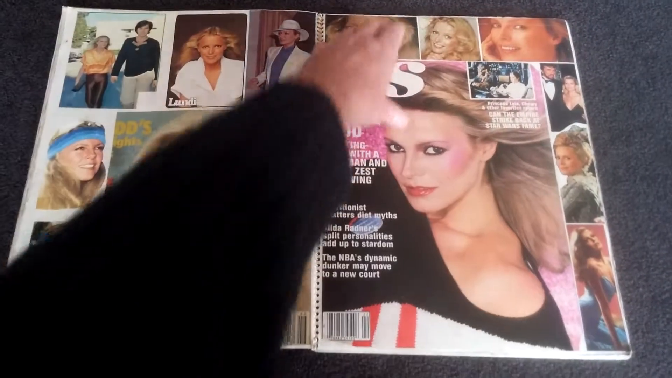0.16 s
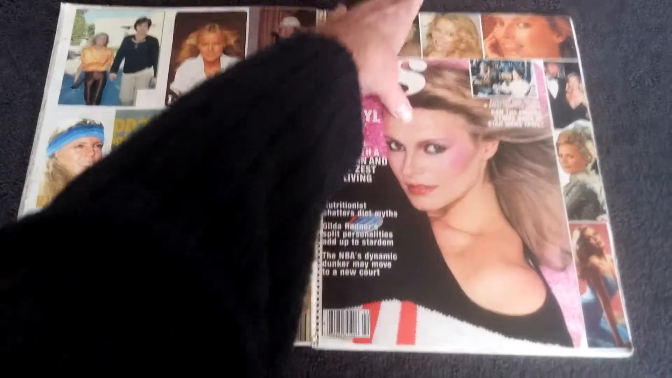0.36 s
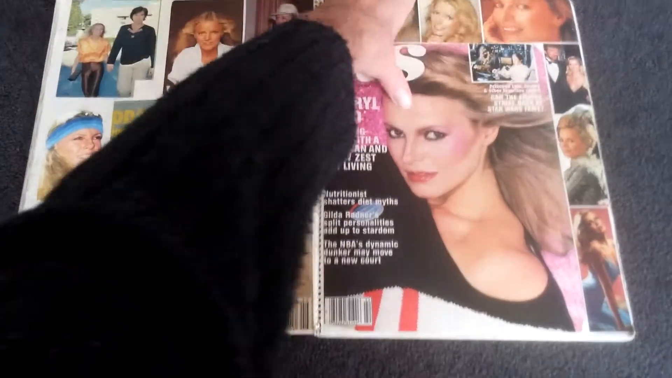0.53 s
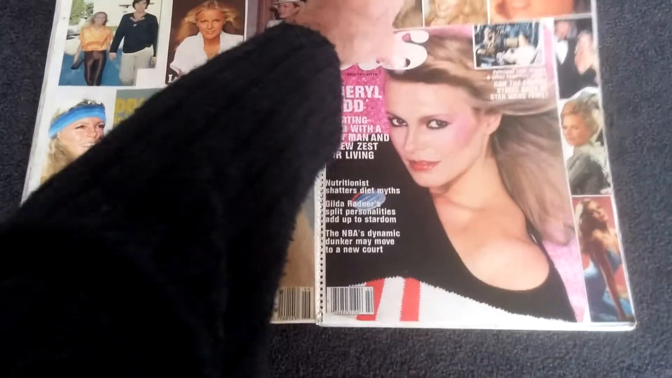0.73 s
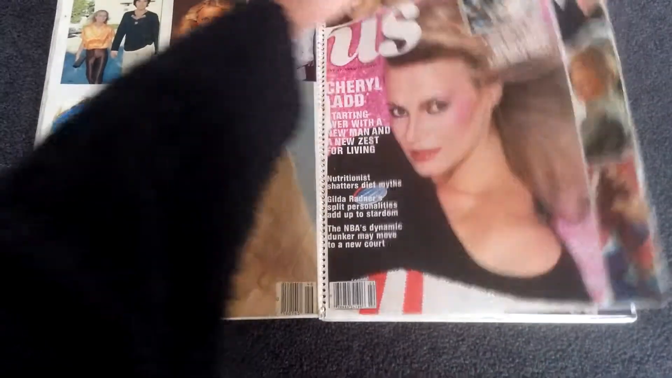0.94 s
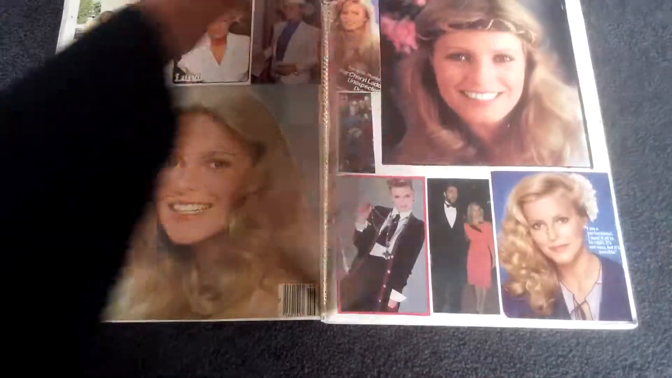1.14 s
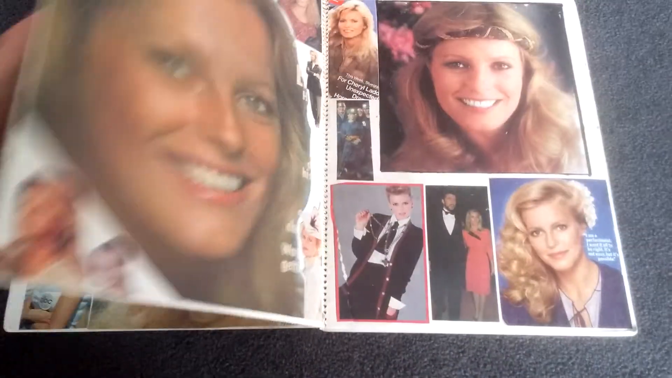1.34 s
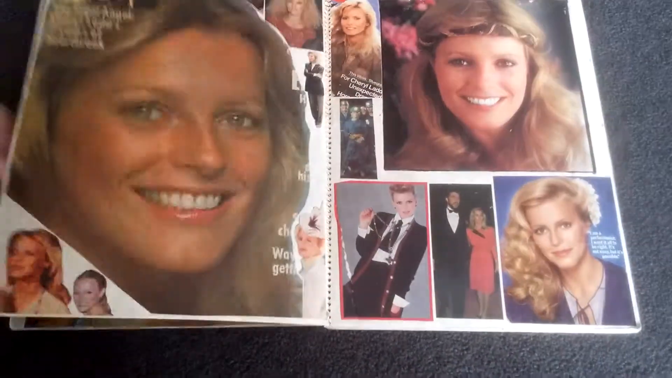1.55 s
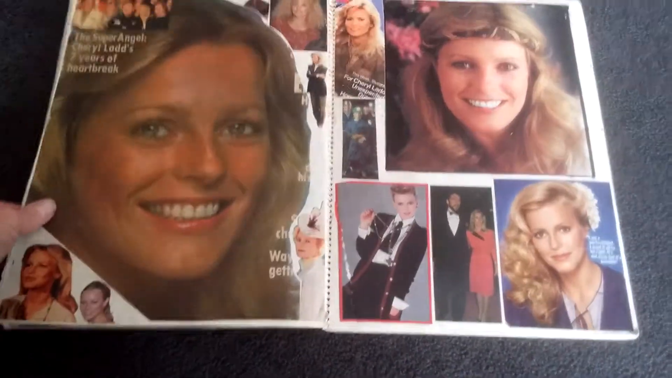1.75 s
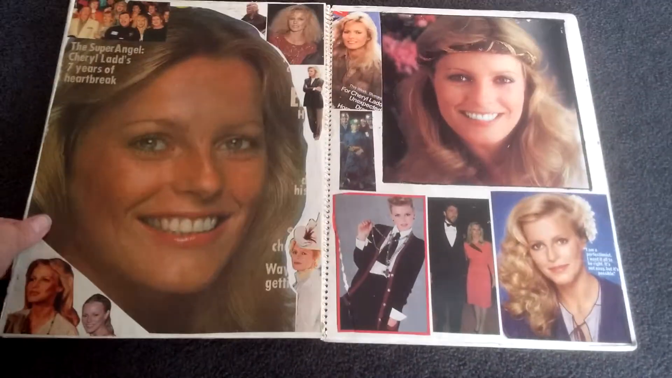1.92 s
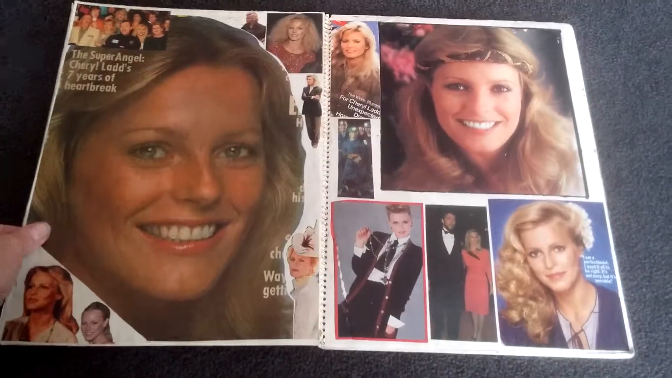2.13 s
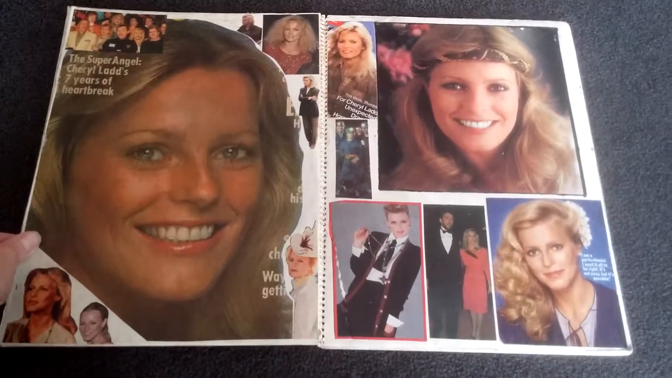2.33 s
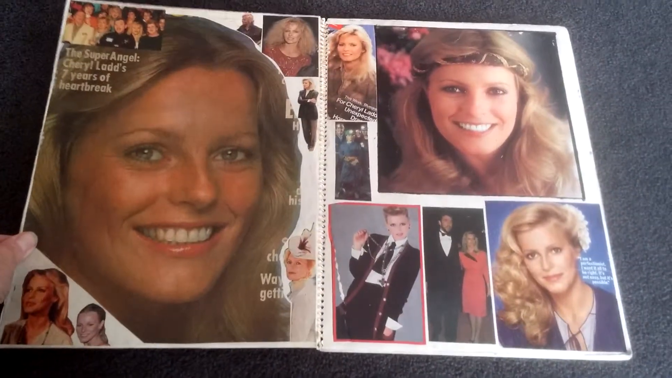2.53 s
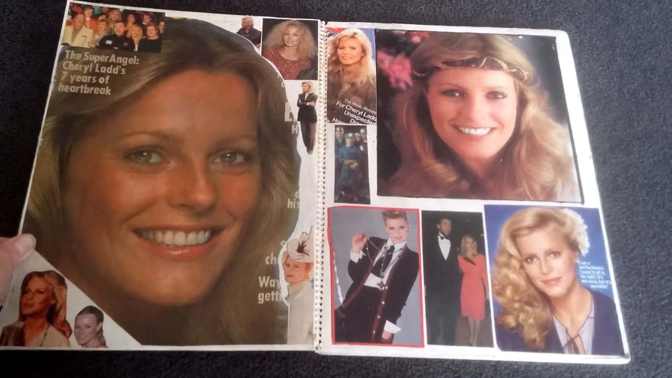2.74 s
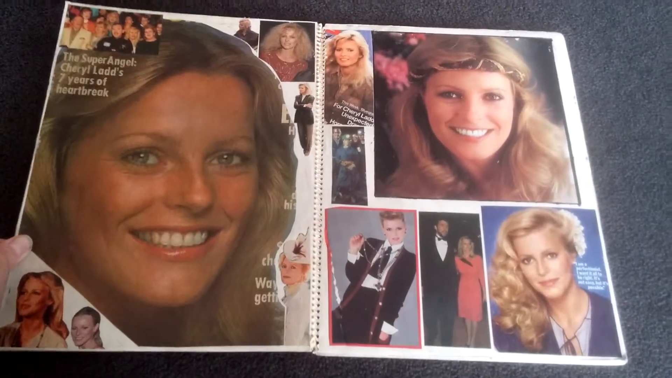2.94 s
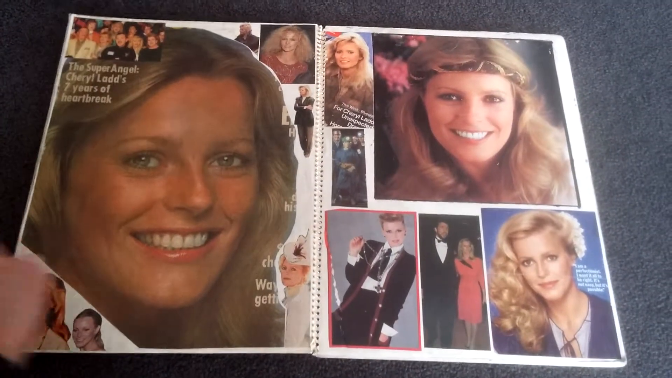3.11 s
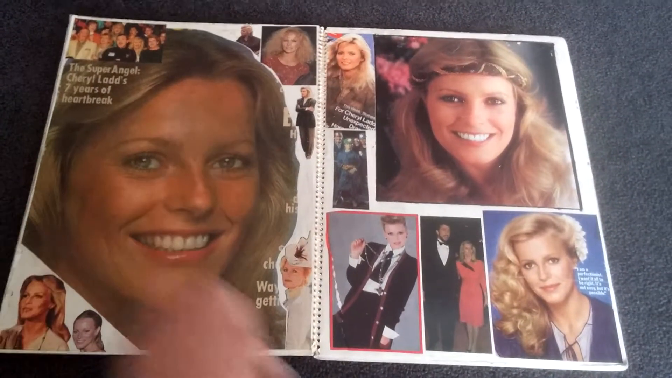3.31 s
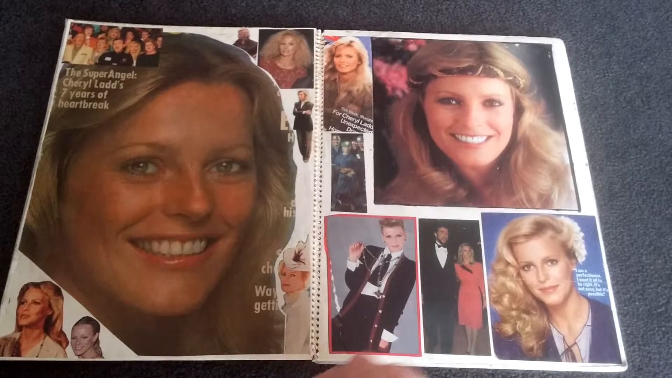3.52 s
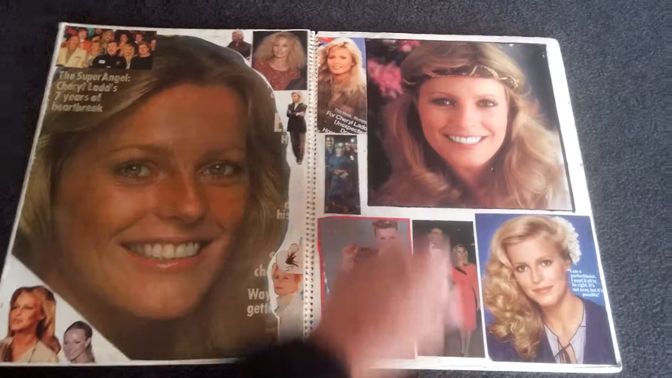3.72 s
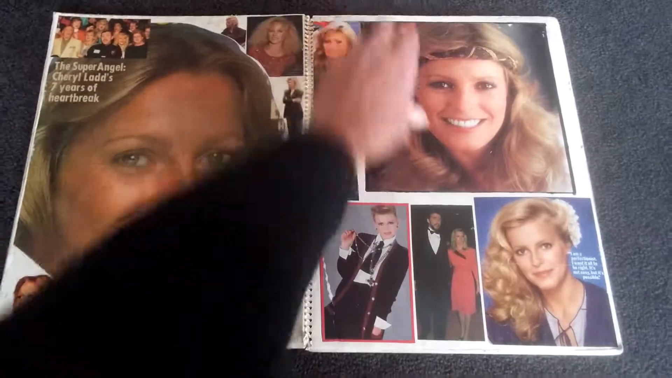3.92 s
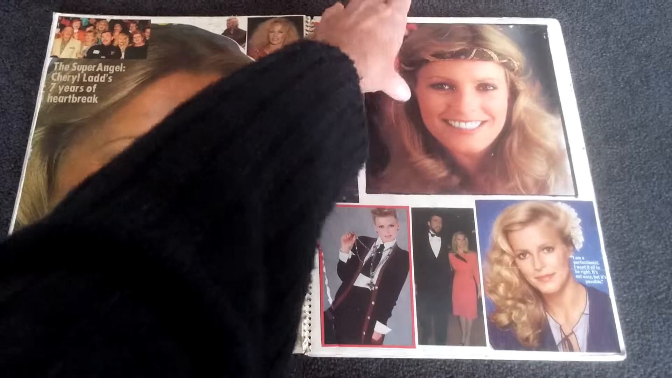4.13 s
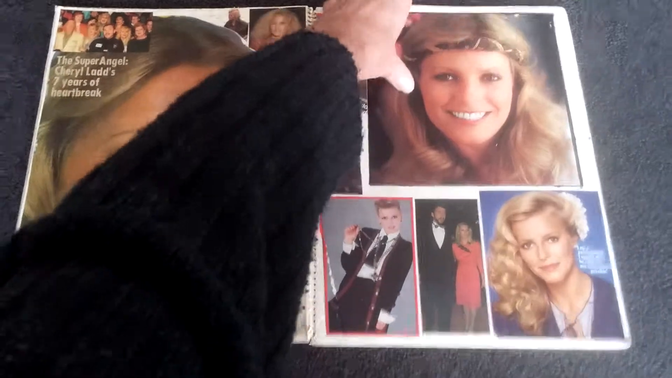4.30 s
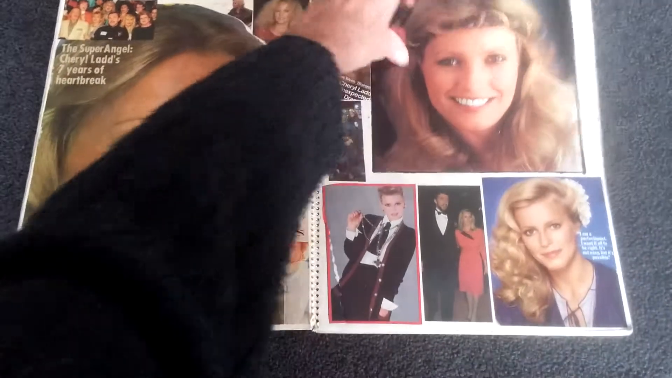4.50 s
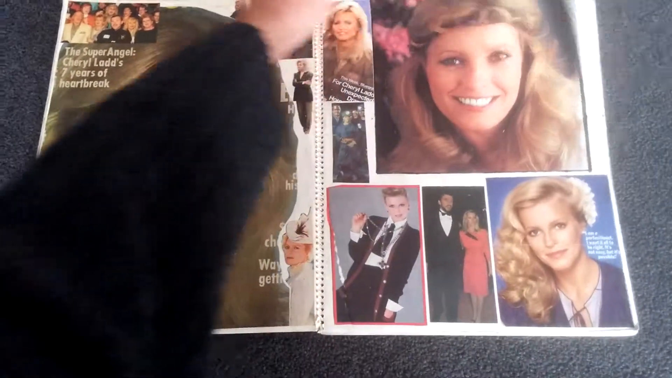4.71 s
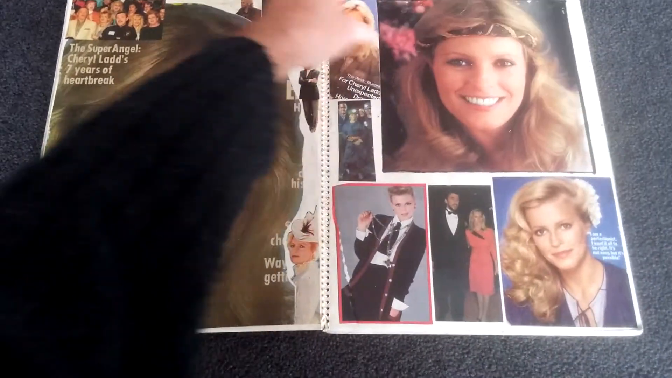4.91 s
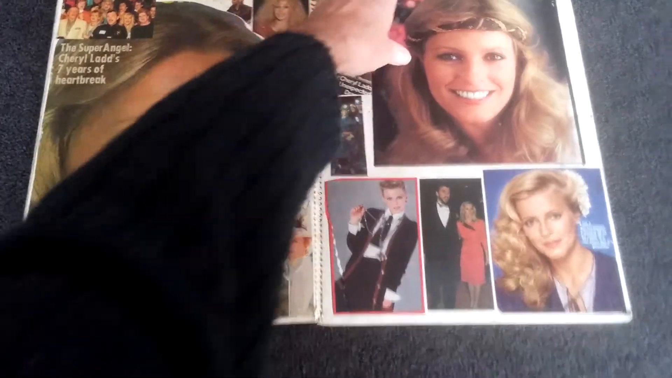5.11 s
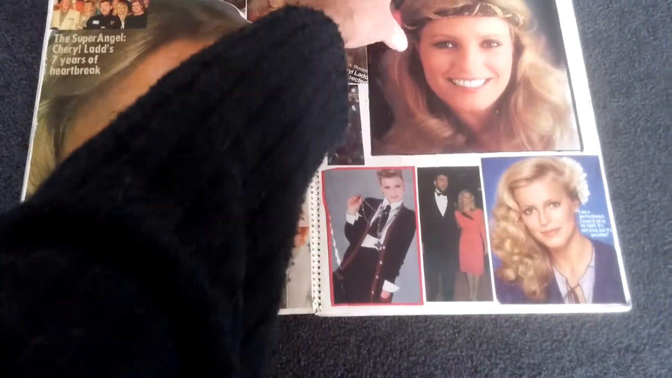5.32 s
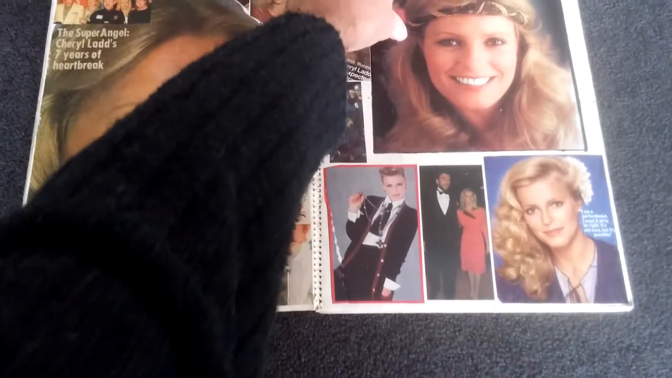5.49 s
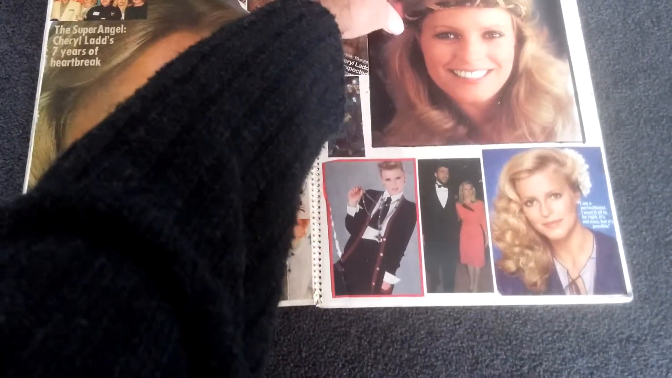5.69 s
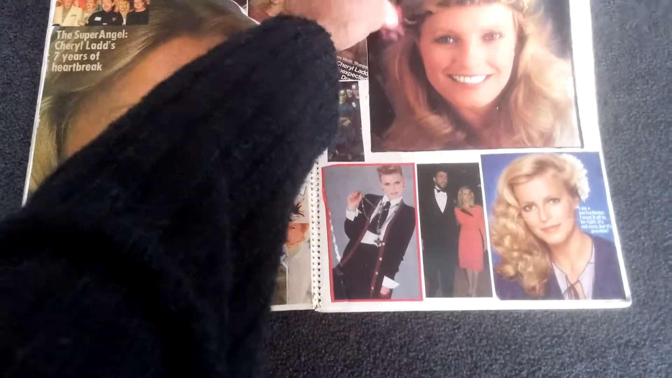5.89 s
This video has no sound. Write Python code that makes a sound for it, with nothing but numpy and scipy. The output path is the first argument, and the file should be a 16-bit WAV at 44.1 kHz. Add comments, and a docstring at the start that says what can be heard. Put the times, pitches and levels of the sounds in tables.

```python
"""Stiff, pasted pages of a spiral scrapbook, turned by hand on carpet in a quiet room.
Sheets buckle with sharp snaps, crackle and flop down. Paper sliding on paper and fingertips on the
gloss hiss with tiny stick-slip clicks. A knitted sleeve rustles and bumps close to the microphone."""
import sys
import numpy as np
from scipy import signal
from scipy.fft import rfft, irfft, next_fast_len
from scipy.io import wavfile

SR = 44100
rng = np.random.default_rng(int(sys.argv[2]) if len(sys.argv) > 2 else 0)


def dump_mix(stems):
    """Bounce the given channels to the path in sys.argv[1] as a 16-bit WAV at rate SR."""
    frames = np.atleast_2d(stems).T  # one column per channel
    limited = np.clip(frames, -1, 1)  # hard clip at full scale
    pcm = np.round(limited * 32767).astype(np.int16)
    wavfile.write(sys.argv[1], SR, pcm)


N = 262395
TIME = np.arange(N) / SR

# rubbed paper: freq_hz, gain_db
RUB_SPECTRUM = [(150, 1), (300, 2), (600, -5), (950, 2), (1500, 3.5), (2200, 0.5), (3000, -5.5), (3800, -9),
                (5500, -8), (7500, -20.5), (15000, -31.5)]


def undb(db):
    """Decibels to gain."""
    return 10 ** (np.asarray(db) / 20)


def unit(x):
    """Scale to rms 1."""
    return x / np.sqrt(np.mean(x ** 2) + 1e-30)


def add(track, start_s, sound):
    """Mix a sound into the track."""
    start = int(np.clip(round(start_s * SR), 0, N - 1))
    track[start:start + len(sound)] += sound[:N - start]


def decay(t, t60_s):
    """Fall of 60 dB per t60_s."""
    return np.exp(-np.log(1000) * t / t60_s)


def swell(peak_s, attack_s, hold_s, release_s):
    """Rise to 1, hold, fall; 20 dB per attack_s and per release_s."""
    early_s, late_s = np.maximum(peak_s - TIME, 0), np.maximum(TIME - peak_s - hold_s, 0)
    return 10 ** -(early_s / attack_s + late_s / release_s)


def walk(rate_hz, t=TIME):
    """Smooth random curve, spread near 1."""
    knots = len(t) // 20
    return np.interp(t * rate_hz, np.arange(knots), rng.standard_normal(knots))


def colour(x, spectrum, tilt_db_oct=0):
    """Filter by (freq_hz, gain_db) points plus a tilt; rms 1."""
    size = next_fast_len(len(x))
    octave = np.log2(np.maximum(np.fft.rfftfreq(size, 1 / SR), 1))
    hz, db = np.transpose(spectrum)
    below_oct = np.maximum(np.log2(hz[0]) - octave, 0)
    gain_db = np.interp(octave, np.log2(hz), db) + tilt_db_oct * octave - 20 * below_oct
    return unit(irfft(rfft(x, size) * undb(gain_db), size)[:len(x)])


def slips(t, rate_hz, spread_db):
    """Fibres catch and let go: dense clicks of unequal size."""
    catch = rng.random(len(t)) < rate_hz / SR
    size = undb(spread_db * np.minimum(rng.exponential(size=len(t)), 4))
    return unit(catch * size * rng.standard_normal(len(t)))


def friction(spectrum, rate_hz, spread_db, judder_db, judder_hz, tilt_db_oct=0, t=TIME):
    """Sliding contact: slips coloured by the surface, in uneven pushes; rms 1."""
    surface = colour(slips(t, rate_hz, spread_db), spectrum, tilt_db_oct)
    return unit(surface * undb(judder_db * walk(judder_hz, t)))


def rub_noise():
    """Broad friction on paper."""
    return friction(RUB_SPECTRUM, rate_hz=4400, spread_db=2, judder_db=2, judder_hz=59.9)


def rustle_noise():
    """Low, hollow friction."""
    # wool or arched sheet: freq_hz, gain_db
    spectrum = [(120, -25), (220, 1.5), (310, 4.5), (390, 4.5), (500, -2.5), (800, -12), (2000, -31.5)]
    return friction(spectrum, rate_hz=6600, spread_db=1, judder_db=2.5, judder_hz=25)


def thump(hz, t60_s, sag=0.082, wobble=0.22, wobble_hz=130, scuff_db=-8):
    """Soft contact: a wobbling, sagging tone with a dull scuff; peak 1."""
    t = TIME[:SR // 4]
    give = 1 + wobble * walk(wobble_hz, t)
    droop = 1 + sag * (2 * np.exp(-2 * t / t60_s) - 1)
    cycles = np.cumsum(hz * give * droop) / SR
    scuff_spectrum = [(hz / 2, 0), (hz, -1), (2 * hz, -13), (10 * hz, -60), (SR / 2, -90)]
    scuff = colour(rng.standard_normal(len(t)), scuff_spectrum)
    onset = 1 - np.exp(-(2 * cycles) ** 2)  # half a cycle
    blow = (np.sin(2 * np.pi * cycles) + undb(scuff_db) * scuff) * onset * decay(t, t60_s)
    return blow / np.abs(blow).max()


def background_hiss(level_db=-67):
    """Faint steady noise."""
    # noise floor: freq_hz, gain_db
    spectrum = [(15, -31), (25, -7.5), (55, -5), (102, -8.5), (152, -4), (414, -5.5), (461, -4),
                (500, -6.5), (1060, -10), (1780, -11.5), (1930, -11.5), (4820, -15), (9990, -27),
                (14600, -29), (15800, -24.5)]
    return undb(level_db) * colour(rng.standard_normal(N), spectrum)


def sleeve_rustle(skew=1.32, rub_db=-4.5):
    """Wool rustles and rubs the book; the arm gathers speed slowly and stops quickly."""
    # arm reaches: start_s, end_s, level_db
    reaches = [(0.167, 0.59, -68.5), (3.502, 4.103, -66), (4.125, 4.554, -65), (4.967, 5.407, -68.5),
               (5.492, 5.82, -74.5)]
    speed = np.zeros(N)
    for start_s, end_s, level_db in reaches:
        progress = np.clip((TIME - start_s) / (end_s - start_s), 0, 1)
        speed += undb(level_db) * np.sin(np.pi * progress ** skew).clip(0) ** .5
    return speed * (rustle_noise() + undb(rub_db) * rub_noise())


def finger_strokes():
    """Fingertips hiss on the gloss, landing quickly, lifting slowly; each stroke has its own brightness."""
    # strokes: start_s, end_s, level_db, tilt_db_oct
    strokes = [(0.2, 0.357, -67, 4.5), (0.616, 0.644, -65.5, 1.5), (1.222, 1.294, -57.5, 9),
               (1.294, 1.392, -62.5, 4), (1.379, 1.468, -63.5, 1.5), (1.483, 1.553, -63.5, 4),
               (1.56, 1.703, -60, 5.5), (1.678, 1.846, -60.5, 3.5), (1.889, 2.135, -66.5, 3.5),
               (2.109, 2.185, -68, -9.5), (2.223, 2.386, -64.5, -5.5), (2.509, 2.703, -67, 4),
               (2.82, 2.953, -66, 5), (3.061, 3.21, -68, -4.5), (3.125, 3.197, -59.5, -3),
               (4.515, 4.633, -66, -1.5), (5.449, 5.59, -67.5, 6.5), (5.844, 5.902, -66.5, -0.5)]
    # skin on glossy paper: freq_hz, gain_db
    spectrum = [(1000, -11.5), (1800, -11), (2300, 6), (3000, -6.5), (3900, 3.5), (4500, -4), (5200, 3.5),
                (6500, -5.5), (7600, -12), (9200, -2), (11300, -6), (13500, -10), (15500, -9)]
    out, t = np.zeros(N), TIME[:SR // 3]
    for start_s, end_s, level_db, tilt_db_oct in strokes:
        progress = np.minimum(t / (end_s - start_s), 1)
        pressure = np.sin(np.pi * progress ** .75).clip(0) ** .8
        skin = friction(spectrum, rate_hz=5000, spread_db=3, judder_db=2.5, judder_hz=80,
                        tilt_db_oct=tilt_db_oct, t=t)
        add(out, start_s, undb(level_db) * pressure * skin)
    return out


def sleeve_bumps(pitch_hz=96.4, t60_s=0.083, rebound_s=0.0332, rebound_db=-8, rebound_oct=-0.19):
    """Wool bumps the microphone, then touches again, lighter and lower."""
    # bumps: start_s, peak_db
    bumps = [(0.484, -50.5), (.632, -58.5), (3.652, -48), (3.712, -53), (3.782, -56), (3.888, -49),
             (3.925, -45), (3.989, -42), (4.025, -41.5), (4.292, -45.5), (4.319, -40.5), (4.39, -37),
             (4.467, -49.5), (4.51, -52.5), (4.57, -56), (5.11, -47.5), (5.186, -53), (5.261, -45.5)]
    out = np.zeros(N)
    for start_s, peak_db in bumps:
        add(out, start_s, undb(peak_db) * thump(pitch_hz, t60_s))
        rebound = thump(pitch_hz * 2 ** rebound_oct, t60_s)
        add(out, start_s + rebound_s, undb(peak_db + rebound_db) * rebound)
    return out


def paste_crackles(release_s=0.001):
    """Glued cuttings and page edges let go in short runs of slips."""
    # runs: start_s, level_db, length_s, tilt_db_oct
    runs = [(0.65, -57, 0.0035, 8), (0.661, -56, 0.011, 3), (0.822, -61, 0.0064, 2.5),
            (1.242, -42.5, 0.0057, -1.5), (1.26, -43, 0.0037, -4.5), (1.292, -54, 0.013, -2.5),
            (1.371, -46, 0.0022, -5), (1.39, -46.5, 0.0016, 7), (1.5078, -51, .011, -2.5),
            (1.695, -54, 0.0026, -1.5), (2.653, -53, 0.0035, 0.5), (2.916, -51, 0.0027, 2.5),
            (4.716, -37, .001, 11), (4.735, -39, 0.0049, 1.5), (5.4016, -49.5, 0.017, 1),
            (5.422, -53, 0.012, 4), (5.441, -52.5, 0.0095, 3), (5.575, -60, 0.007, 2),
            (5.71, -62, 0.0048, -2), (5.856, -64.5, 0.019, -3)]
    # pasted paper: freq_hz, gain_db
    spectrum = [(200, 1), (430, -10), (700, -2), (1300, 1.5), (2000, 0.5), (3050, -10), (3900, -2.5),
                (5500, -6), (7500, -13), (10000, -9.5), (15500, -19)]
    out, t = np.zeros(N), TIME[:SR // 10]
    for start_s, level_db, length_s, tilt_db_oct in runs:
        run = colour(slips(t, rate_hz=5000, spread_db=3), spectrum, tilt_db_oct)
        envelope = np.exp(-np.maximum(t - length_s, 0) / release_s)
        add(out, start_s, undb(level_db) * run * envelope)
    return out


def page_rubs():
    """The bending page rubs its neighbours; contacts add in power."""
    # contacts: peak_s, level_db, attack_s, release_s
    rubs = [(.82, -61.5, 0.12, 0.064), (1.15, -57.5, 0.55, 0.46), (1.262, -49.5, 0.063, 0.046),
            (1.37, -56.5, 0.35, 0.14), (1.585, -54, 0.033, 0.29), (1.76, -53, 0.046, 0.14),
            (2.67, -65.5, .12, 0.085), (2.88, -68, .08, 0.19), (4.566, -50.5, 0.057, 0.068),
            (5.415, -61.5, .012, 0.075), (5.924, -56.5, 0.017, .3)]
    contacts = [undb(level_db) * swell(peak_s, attack_s, 0, release_s)
                for peak_s, level_db, attack_s, release_s in rubs]
    return np.linalg.norm(contacts, axis=0) * rub_noise()


def buckle_snaps(ping_db=-9.5, ping_t60_s=0.019, glide=0.52, glide_s=0.0003,
                 crease_db=-24, crease_s=0.013, push_s=0.00008):
    """A buckle rings the page, pings at the bend and crackles in the crease; returns cracks, pings."""
    # buckles: start_s, level_db, tilt_db_oct, ping_hz
    buckles = [(0.934, -40.5, -8, 4100), (0.9727, -33, -8, 4100), (0.977, -26, -8, 4030),
               (1.0121, -32, -4.5, 4100), (1.016, -32.5, -3.5, 4000), (1.091, -42, -6, 4170),
               (1.1074, -25.5, -2, 4250), (1.1185, -28.5, -1.5, 4220), (1.131, -41.5, -7, 4000),
               (1.1527, -7.5, 1, 4070), (1.5704, -40.5, -14, 4100), (1.7468, -35, -8, 4100),
               (2.6529, -41, 3.5, 3970), (4.4845, -41, -5, 2930), (4.488, -39, -18, 3000),
               (4.718, -23, 0.5, 5560), (4.737, -16, 6.5, 5270), (4.7392, -19.5, 2, 3940),
               (5.6485, -49.5, -3, 4050), (5.9197, -32.5, -24, 2140), (5.942, -36, -14, 2370)]
    # stiff page modes: freq_hz, t60_s, gain_db
    modes = [(852, 0.0062, -11), (1226, 0.0062, -3), (1790, 0.0029, 3.5), (2180, 0.0038, 2),
             (3620, 0.007, -18), (4700, 0.0042, -19), (8700, 0.004, -11.5)]
    pivot_hz = modes[1][0]
    cracks, pings, t = np.zeros(N), np.zeros(N), TIME[:SR // 10]
    push = np.exp(-.5 * ((t[:SR // 1000] - 2 * push_s) / (push_s / 2)) ** 2)
    edge_leak = signal.butter(3, 480, "high", fs=SR, output="sos")  # air slips round the edge: no bass
    for start_s, level_db, tilt_db_oct, ping_hz in buckles:
        waver = 1 + .05 * walk(900, t)  # the sheet moves
        fall = 1 + glide * np.exp(-t / glide_s)  # short bending waves arrive first
        cycles = np.cumsum(ping_hz * waver * fall) / SR
        ping_gain = undb(ping_db + tilt_db_oct * np.log2(ping_hz / pivot_hz))
        ping = ping_gain * np.sin(2 * np.pi * cycles) * decay(t, ping_t60_s)
        slack = 1 + max(-tilt_db_oct, 0) / 13  # slack, dull bends ring longer
        ring = np.zeros(len(t))
        for k, (hz, t60_s, mode_db) in enumerate(modes):
            bent_hz = hz * (1 + .015 * rng.standard_normal())  # each bend stiffens the sheet differently
            gain = (-1) ** k * undb(mode_db + tilt_db_oct * np.log2(hz / pivot_hz))
            ring += gain * np.sin(2 * np.pi * bent_hz * t) * decay(t, t60_s * slack)
        ring, ping = signal.lfilter(push, 1, [ring, ping])
        peak = np.abs(ring + ping).max()
        crease = colour(slips(t, rate_hz=9000, spread_db=2), RUB_SPECTRUM) * np.exp(-t / crease_s)
        crack = signal.sosfilt(edge_leak, ring / peak + undb(crease_db) * crease)
        add(cracks, start_s, undb(level_db) * crack)
        add(pings, start_s, undb(level_db) * ping / peak)
    return cracks, pings


def page_flops():
    """A page lands on its air cushion or against the book."""
    # landings: start_s, peak_db, pitch_hz, t60_s
    flops = [(1.156, -43, 284, 0.15), (1.319, -47, 185.4, 0.036), (1.333, -34.5, 359, 0.094),
             (1.347, -52, 209, 0.09), (1.49, -51, 174, 0.11), (1.584, -45, 208, 0.092),
             (1.766, -54, 239, 0.1), (4.315, -37.5, 172, 0.04), (4.719, -41, 203, 0.045),
             (4.742, -43, 338, 0.14), (5.94, -43, 356, 0.051)]
    out = np.zeros(N)
    for start_s, peak_db, pitch_hz, t60_s in flops:
        add(out, start_s, undb(peak_db) * thump(pitch_hz, t60_s))
    return out


def page_creep(peak_s=1.905, level_db=-63.5, fade_db_per_s=-8.5, rub_db=-7):
    """A page held at its edge creeps over the next, ever more slowly; its arch rustles hollowly."""
    # slow slide: freq_hz, gain_db
    spectrum = [(700, -16), (1100, -3), (1400, 5), (1800, 6.5), (2250, 7.5), (2800, -7), (5000, -29)]
    scrape = friction(spectrum, rate_hz=6600, spread_db=1.5, judder_db=2, judder_hz=39.87)
    contact = swell(peak_s, attack_s=0.2, hold_s=0.67, release_s=0.24)
    arch = swell(peak_s, attack_s=0.9, hold_s=0.67, release_s=0.57)
    slowing = undb(level_db + fade_db_per_s * np.maximum(TIME - peak_s, 0))
    return slowing * (contact * (scrape + undb(rub_db) * rub_noise()) + arch * rustle_noise())


def page_sweep(peak_s=4.703, level_db=-37):
    """A lifted sheet sweeps off the next so fast that the slips merge into a swish."""
    # fast slide: freq_hz, gain_db
    spectrum = [(200, -16), (550, -15), (900, -13), (1250, 3), (1550, -2.5), (2200, 0), (3200, -7),
                (3800, -5.5), (4600, -7), (5700, 1), (7200, -17), (9600, -10), (12500, -25), (15500, -25)]
    swish = friction(spectrum, rate_hz=35000, spread_db=0.6, judder_db=1.1, judder_hz=150)
    return undb(level_db) * swell(peak_s, attack_s=0.043, hold_s=0.03, release_s=0.031) * swish


def room(x, wet_db=-12, build_s=0.0032):
    """Direct sound plus the short diffuse tail of a furnished room."""
    # tail bands: centre_hz, t60_s, gain_db
    bands = [(200, 0.11, 6.5), (616, 0.26, 4), (1470, 0.24, -3.5), (4000, 0.26, -2.5), (5790, 0.32, -7.5),
             (9000, 0.18, -4)]
    t = TIME[:SR // 2]
    octave = np.log2(np.maximum(np.fft.rfftfreq(len(t), 1 / SR), 1))
    # even scattering: short blocks of flat spectrum and random phase
    scatter = irfft(np.exp(2j * np.pi * rng.random(size=(90, 129)))).ravel()
    spectrum, tail = rfft(scatter[:len(t)]), 0
    centres_oct = np.log2([row[0] for row in bands])
    for share, (_, t60_s, gain_db) in zip(np.eye(len(bands)), bands):
        band = irfft(spectrum * np.interp(octave, centres_oct, share), len(t))
        tail += undb(gain_db) * band * decay(t, t60_s)
    tail *= 1 - np.exp(-(t / build_s) ** 2)
    response = undb(wet_db) * tail / np.linalg.norm(tail)
    return x + signal.fftconvolve(x, response)[:N]


def scene():
    """The book in its room over faint hiss, mono; pings and thumps are heard only close by."""
    hiss = background_hiss()
    cracks, pings = buckle_snaps()
    handling = cracks + paste_crackles() + finger_strokes()
    sliding = sleeve_rustle() + page_rubs() + page_creep() + page_sweep()
    close = pings + sleeve_bumps() + page_flops()
    return (room(handling + sliding) + close + hiss)[None]


def record(dry, low_cut_hz=42, high_cut_hz=15900):
    """Cut the deep bass and the top."""
    thin = signal.sosfilt(signal.butter(2, low_cut_hz, "high", fs=SR, output="sos"), dry)
    return signal.sosfilt(signal.ellip(10, .1, 70, high_cut_hz, fs=SR, output="sos"), thin)


dry = scene()
out = record(dry)
dump_mix(out)
```